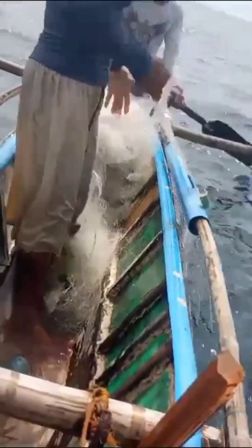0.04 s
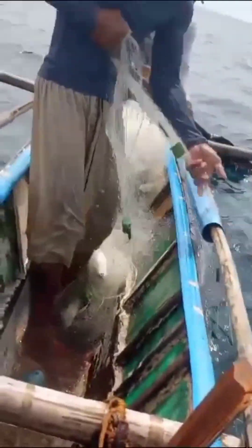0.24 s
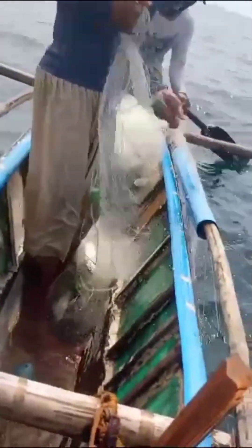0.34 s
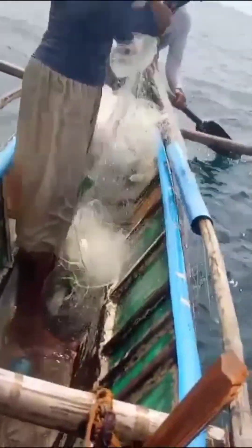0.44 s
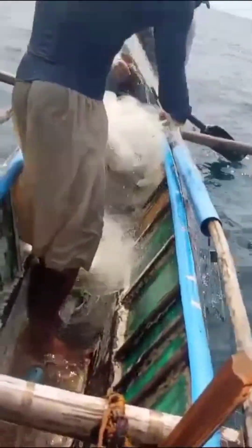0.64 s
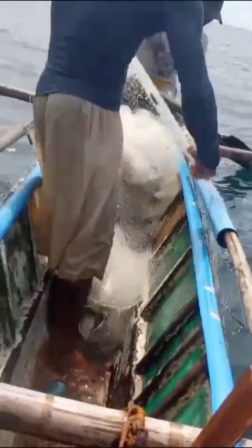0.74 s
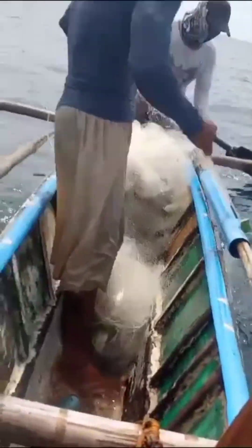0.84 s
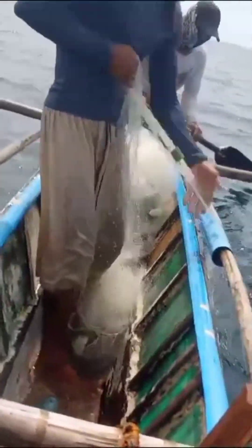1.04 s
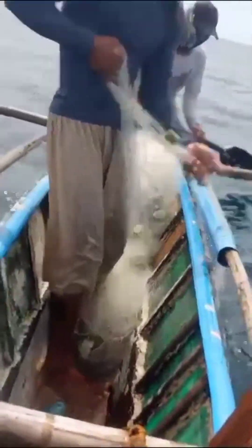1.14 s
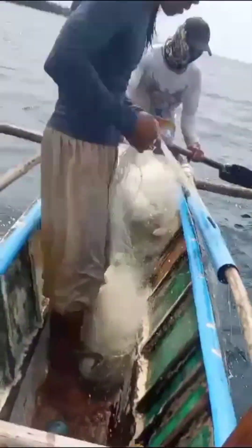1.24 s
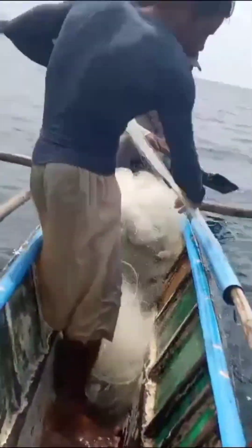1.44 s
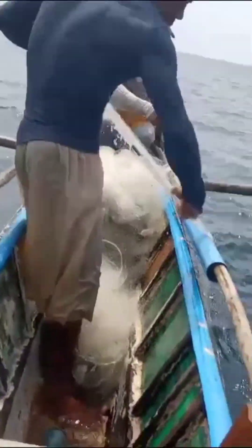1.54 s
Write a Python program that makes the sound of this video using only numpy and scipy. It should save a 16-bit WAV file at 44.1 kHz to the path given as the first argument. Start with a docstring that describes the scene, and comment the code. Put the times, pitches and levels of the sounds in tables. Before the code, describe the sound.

A wooden paddle pounds quickly and steadily on a wooden boat's rail, about twelve knocks a second with small bouncing clatter between, then stops, leaving soft lapping, faint ticks and bubbles; outdoors, picked up by a phone aboard.

```python
"""A wooden paddle is pounded fast on the rail of a small wooden boat, some way along the hull from a phone.
Bending waves run down the planks, treble first and bass late, so each knock falls in pitch: swells of noise
and tone ring the hull's resonances. Small knocks clatter on the boards, many of them the paddle bouncing, made
of short runs of noise. Wet line ticks in tiny noise bursts, the sea laps as bands of noise with wavering
levels, and bubbles are short sines that rise in pitch."""
import sys
import numpy as np
from scipy import signal
from scipy.io import wavfile
from scipy.ndimage import uniform_filter1d

SR = 44100
rng = np.random.default_rng(int(sys.argv[2]) if len(sys.argv) > 2 else 0)


def store_pcm(level_fs):
    """Save levels as 16-bit WAV."""
    pcm = np.round(np.clip(level_fs, -1, 1) * 32767).astype(np.int16)
    wavfile.write(sys.argv[1], SR, np.atleast_2d(pcm).T)


N = 70560
LN1000 = np.log(1000)  # a fall of 60 dB, for decay times written t60


def undb(db):
    """Turn decibels into a plain amplitude factor."""
    return 10 ** (np.asarray(db) / 20)


def unit(x):
    """Scale to a peak of 1."""
    return x / np.abs(x).max()


def band(x, hz, share):
    """Resonant band-pass, width as a share of the centre."""
    return signal.lfilter(*signal.iirpeak(min(hz, .45 * SR), 1 / share, fs=SR), x)


def steep_band(x, hz, share):
    """The same band-pass twice in a row, for steeper sides."""
    return band(band(x, hz, share), hz, share)


def add(out, x, s):
    """Mix x into out, starting at s seconds."""
    i = max(int(s * SR), 0)
    out[i:i + len(x)] += x[:N - i]


def walk(rate):
    """Random levels, rate of them per second, smoothed twice into a wavering curve with a spread near 1."""
    hold = int(SR / rate)
    steps = np.repeat(rng.standard_normal(N // hold + 1), hold)
    return 1.2 * uniform_filter1d(uniform_filter1d(steps, hold), hold)[:N]


def bubble(hz, length, rise):
    """A sine that swells and fades softly while its pitch climbs by the share `rise`."""
    u = np.arange(int(length * SR) + 2) / (length * SR)  # 0 to 1 over the bubble's life
    swell = np.sin(np.pi * np.minimum(u, 1) ** 0.47)
    return swell * np.sin(2 * np.pi * hz * length * (u + rise * u ** 2 / 2))


def lapping():
    """Water against the hull: third-octave noise bands that swell together and flicker each on its own."""
    # tone balance of the water: f/Hz, relative level/dB
    balance = [(25, -21), (90, 12.5), (250, 7), (600, 1.5), (1000, -1), (1500, -5), (2000, -10), (2700, 3),
               (3500, -22.5), (6200, -11.5), (7600, -60.5), (9500, -15), (13500, -52)]
    level_db, swell_db, flicker_db = -49.5, 2.5, 2.2
    patter_db_per_octave = -0.5  # the treble comes in short spurts, stronger the higher the band
    f, db = np.array(balance).T
    out, swell, patter = np.zeros(N), walk(6), walk(90)
    for hz in 28 * 2 ** np.arange(0, 9, 1 / 3):
        noise = steep_band(rng.standard_normal(N), hz, .3)
        octaves_up = max(np.log2(hz / 200), 0)
        gain_db = np.interp(np.log(hz), np.log(f), db) + swell_db * swell
        gain_db += flicker_db * walk(46) + patter_db_per_octave * octaves_up * patter
        out += noise * undb(gain_db)
    return out * undb(level_db) / np.sqrt(np.mean(out ** 2))


def bubbles():
    """Many faint random bubbles make a fizz, with a few clear ones at set times; all rise in pitch."""
    # clear bubbles: t/s, level/dB, starting f/Hz, length/s, rise as a share of the pitch
    clear_bubbles = [(1.356, -47.5, 752, 0.1, 0.024), (1.42, -39, 855, 0.018, 0.43),
                     (1.449, -41, 1147, 0.0045, 0.11), (1.514, -54.5, 1550, 0.0043, 0.04),
                     (1.535, -67, 690, .012, .2), (1.59, -48, 1440, 0.022, 0.068)]
    fizz_per_s, fizz_low_hz, fizz_high_hz = 160, 548, 6000
    quietest_db, spread_db = -53, 3.6
    out = np.zeros(N)
    for when, pitch, loud in rng.random((int(fizz_per_s * N / SR), 3)):
        hz = fizz_low_hz * (fizz_high_hz / fizz_low_hz) ** pitch
        tiny = bubble(hz, 9.2 / hz, 0.37)  # lasts 9.2 periods of its starting pitch
        add(out, undb(quietest_db + spread_db * loud) * tiny, when * N / SR)
    for s, level_db, hz, length, rise in clear_bubbles:
        add(out, undb(level_db) * bubble(hz, length, rise), s)
    return out


def ticks():
    """Wet line ticks: tiny bright bursts of band-passed noise."""
    # ticks: t/s, level/dB, f/Hz
    tick_list = [(0.4144, -46, 7090), (0.4244, -41, 8910), (0.4364, -50, 8480), (0.4484, -47, 7290),
                 (0.4723, -43, 6810), (0.5944, -54, 8500), (0.9544, -52, 8500), (1.1205, -52, 8500),
                 (1.0266, -55, 6800), (1.2206, -46, 6930), (1.3219, -47, 8700), (1.3553, -49, 6900),
                 (1.3763, -55, 8680), (1.4107, -39, 8700), (1.4234, -52, 7190), (1.4334, -52, 8730),
                 (1.4601, -53, 6980)]
    peak_s = .002  # the burst's envelope is highest this long after its start
    out, t = np.zeros(N), np.arange(1024) / SR
    for s, level_db, hz in tick_list:
        burst = rng.standard_normal(len(t)) * t * np.exp(-t / peak_s)
        add(out, undb(level_db) * unit(band(band(burst, hz, 0.35), hz, .5)), s)
    return out


def rattles():
    """Clatter on the boards, much of it the paddle bouncing: noise knocks ring a bright band, board and grit."""
    # small knocks: t/s, level/dB, bright band f/Hz, length/s (time to fade to about a third), board level/dB
    rattle_list = [(0.0392, -23.5, 2460, 0.016, -15), (0.072, -28.5, 2750, 0.012, -9),
                   (0.1522, -31, 2380, 0.0071, 3.5), (0.227, -35, 2620, 0.033, 10.5),
                   (0.413, -20, 2420, 0.0047, 1.5), (0.422, -20, 2320, 0.018, 0.5),
                   (0.431, -33.5, 2460, 0.0097, 7), (0.4708, -23.5, 2330, 0.018, 5),
                   (0.553, -31.5, 2400, 0.018, 5), (0.586, -39, 2270, 0.021, 0),
                   (0.639, -28.5, 2420, 0.014, 4.5), (0.723, -31, 2810, 0.012, 8),
                   (0.9035, -33.5, 2400, 0.03, 5), (0.989, -25.5, 2760, 0.012, 5.5),
                   (1.064, -33, 2750, 0.034, 6), (1.162, -36.5, 2740, 0.011, 10),
                   (1.2178, -22, 3090, 0.0066, 2), (1.2299, -21.5, 2400, 0.019, 0.5),
                   (1.253, -32.5, 2500, 0.03, 2.5), (1.302, -35, 2940, 0.015, 7.5),
                   (1.352, -40.5, 3120, 0.011, -31), (1.454, -40, 2800, 0.0056, -8),
                   (1.512, -37.5, 1520, 0.0088, -12), (1.5817, -50, 2600, 0.018, -4)]
    knocks_per_s = 320
    board_hz, thud_hz, grit_hz = 930, 292, 5700
    thud_db, grit_db = -3, -14  # the thud is set against the board, the grit against the bright band
    out, t = np.zeros(N), np.arange(4096) / SR
    for s, level_db, hz, length, board_db in rattle_list:
        chance, strength = rng.random(len(t)), rng.standard_normal(len(t))
        shape = np.minimum(t / 0.0003, 1) * np.exp(-(t / length) ** 2)
        knocks = shape * strength * ((chance < knocks_per_s / SR) + .13)  # sparse knocks over a faint hiss
        knocks[30] += .7  # one sure knock near the start
        x = unit(steep_band(knocks, hz, 0.26))
        x += undb(board_db) * unit(steep_band(knocks, board_hz, 0.74))
        x += undb(board_db + thud_db) * unit(steep_band(knocks, thud_hz, 0.46))
        x += undb(grit_db) * unit(steep_band(knocks, grit_hz, .3))
        add(out, undb(level_db) * x, s)
    return out


def mode(x, hz, t60):
    """One damped resonance: it rings at hz and falls 60 dB in t60 seconds."""
    pole = np.exp(2j * np.pi * hz / SR - LN1000 / (t60 * SR))
    return signal.lfilter([1], [1, -pole], x).imag


def board_shiver(t, noise):
    """Loose boards shiver after a blow: spiky noise in a middle and a low band dies away slowly."""
    high_db, high_hz, low_db, low_hz, t60 = -19.5, 2300, -16, 483, .12
    spiky = noise ** 3
    fade = np.exp(-LN1000 * t / t60)
    high = np.minimum(t / 0.0082, 1) * fade * band(spiky, high_hz, .8)
    low = t * fade * band(spiky[::-1], low_hz, 0.33)  # reversed, so it differs from the high part
    return undb(high_db) * unit(high) + undb(low_db) * unit(low)


def first_snap(t, slow):
    """First touch, heard through the air: a very short tone burst, weaker when the contact is slow."""
    level_db, fade_s, hz = -8.5, 0.00041, 2226
    burst = t * np.exp(-t / fade_s) * np.sin(2 * np.pi * hz * t)
    return undb(level_db) / max(slow, .3) * unit(steep_band(burst, hz, 1.0))


def contact_crack(t, noise):
    """Gritty contact noise: a short burst of spiky noise in a bright band."""
    level_db, t60, hz = -18, 0.019, 4740
    burst = t * np.exp(-LN1000 * t / t60) * noise ** 3
    return undb(level_db) * unit(steep_band(burst, hz, .6))


def wave_drive(t, noise, hz, pitch, slow):
    """Bending waves arrive in a swell, later and longer the lower their pitch."""
    travel_s_at_1khz, treble_hz = 0.0036, 2080  # delays count from the arrival of treble_hz
    pile_up_s_at_1khz, pile_up_slope = 0.0033, 0.53
    rough = .5  # share of scattered noise; the rest is a steady tone
    late = travel_s_at_1khz * max(np.sqrt(1000 / hz) - np.sqrt(1000 / treble_hz), 0)
    late += .004 * (hz < 120)  # seconds: the whole hull booms last
    pile_up_s = max(slow, .3) * pile_up_s_at_1khz * (1000 / hz) ** pile_up_slope
    u = np.maximum(t - late, 0) / pile_up_s
    scatter = steep_band(noise, pitch, 0.41)
    tone = np.cos(2 * np.pi * pitch * t)
    return u * np.exp(-u) * (rough * scatter / scatter.std() + (1 - rough) * tone)


def paddle():
    """Each blow sends a swell of bending waves into every hull mode, with a snap, a crack and a shiver."""
    # paddle blows: t/s, level/dB, mids/dB, bass/dB (both against the treble),
    # slowness of contact (1 = ordinary, less = crisper, more = slower swell)
    blows = [(0.1179, -20.5, 10, -4, 1.32), (0.2045, -18, 11, -1.5, 0.99), (0.2862, -10.5, 4, -9, 0.98),
             (0.3722, -13, 10.5, -6, 0.88), (0.4488, -11.5, 6.5, -13.5, 1.09), (0.533, -15, 9, -6, 1.17),
             (0.6184, -15, 7.5, -5.5, 1.18), (0.705, -12, 5.5, -10.5, 0.96), (0.784, -22, 15, 2.5, 0.99),
             (0.799, -14.5, -6, -28, 1.08), (0.8672, -11.5, 5.5, -11.5, 1.07), (0.9521, -15, 7.5, -8, 1.13),
             (1.034, -34, 13.5, 7, 1.35), (1.0476, -23, 9.5, 4, 0.54), (1.117, -11.5, 5.5, -10.5, 1.1),
             (1.2, -23, 13.5, 2.5, 1.07), (1.2795, -13, 9, -9, 1.13)]
    # hull resonances: f/Hz, level/dB, t60/s
    hull_modes = [(96.9, -8, 0.05), (172.8, -1, 0.015), (229.7, -10.5, 0.088), (301.4, -6, 0.029),
                  (374.2, -23, 0.2), (465.4, -3, 0.015), (635, -14, 0.036), (747.7, -9, 0.006),
                  (1009.8, -5, 0.0093), (1172, -11, 0.02), (1420, -25, 0.016), (1601, -14.5, 0.021),
                  (2055, -10, 0.026), (2196, -2.5, 0.0033), (2528, -12.5, 0.03), (2751, -16.5, 0.03),
                  (3076, -14.5, 0.019), (3855, -28.5, 0.0074), (4425, -23, 0.007)]
    colour_hz = [270, 866, 2080]  # where the bass, mids and treble levels act
    spot_db, detune = 1.2, .006  # random spread of each mode's level, and of its pitch as a share
    swell_db = -11.5  # level of the blow's own swell, heard without the ringing
    out, t = np.zeros(N), np.arange(8192) / SR
    for s, level_db, mids_db, bass_db, slow in blows:
        x = board_shiver(t, rng.standard_normal(len(t)))
        x += first_snap(t, slow)
        x += contact_crack(t, rng.standard_normal(len(t)))
        for hz, db, t60 in hull_modes:
            spot, tune = rng.standard_normal(2)
            pitch = hz * (1 + detune * tune)
            drive = wave_drive(t, rng.standard_normal(len(t)), hz, pitch, slow)
            colour_db = np.interp(np.log(hz), np.log(colour_hz), [bass_db, mids_db, 0])
            ring = unit(mode(drive, pitch, t60)) + undb(swell_db) * unit(drive)
            x += undb(db + colour_db + spot_db * spot) * ring
        add(out, undb(level_db) * x, s)
    return out


def dull(x):
    """Wood radiates little above 5830 Hz: a steep loss of the top."""
    return signal.sosfilt(signal.butter(3, 5830, fs=SR, output="sos"), x)


def scene():
    """Sea and wet line, with the clatter and the paddle dulled by the wood."""
    water = lapping() + bubbles()
    wood = dull(rattles() + paddle())
    return (water + ticks() + wood)[None]


def record(dry):
    """The phone drops the deep bass, rounds the peaks and cuts the top."""
    low_cut_hz, limit, top_hz = 91.6, .6, 13800
    dry = signal.sosfilt(signal.butter(2, low_cut_hz, "high", fs=SR, output="sos"), dry)
    dry = dry / (1 + np.abs(dry / limit) ** 4) ** .25  # peaks bend smoothly and stay below the limit
    return signal.sosfilt(signal.ellip(8, .2, 70, top_hz, fs=SR, output="sos"), dry)


dry = scene()
out = record(dry)
store_pcm(out)
```